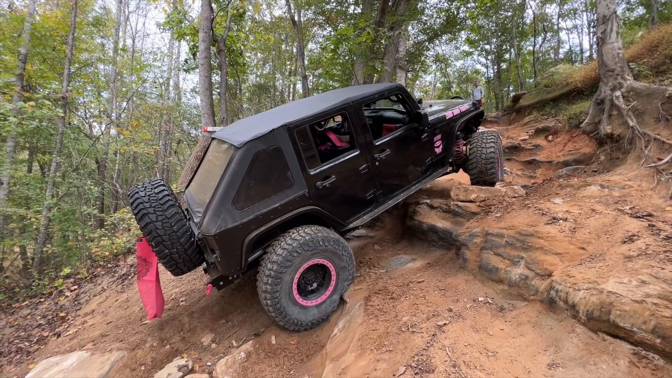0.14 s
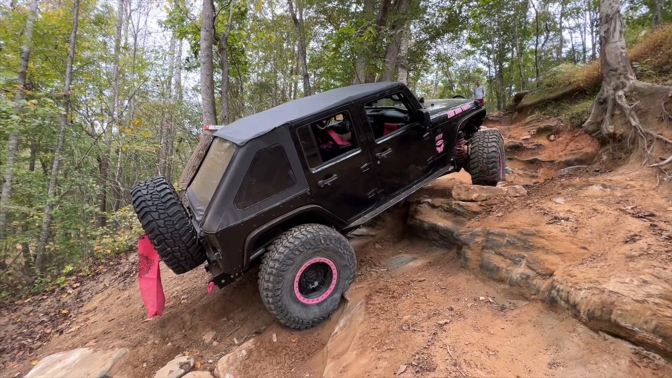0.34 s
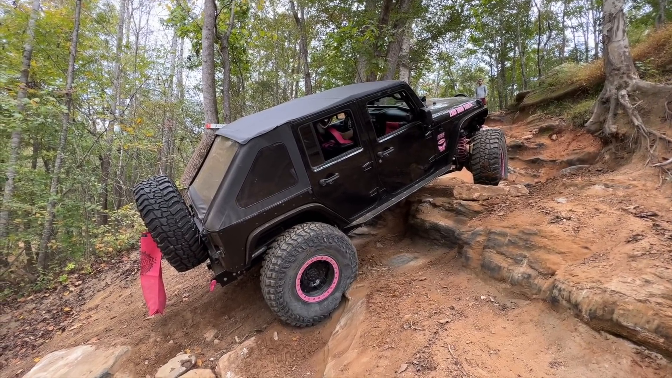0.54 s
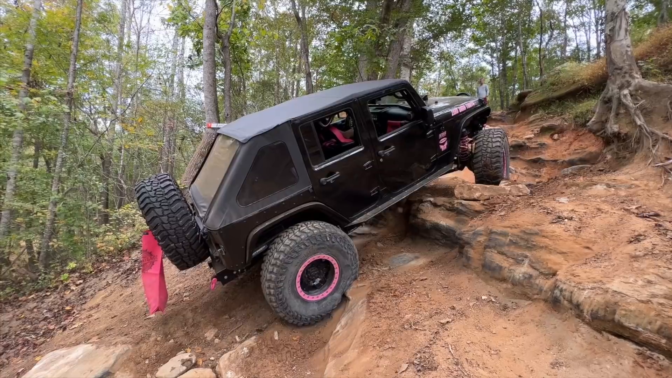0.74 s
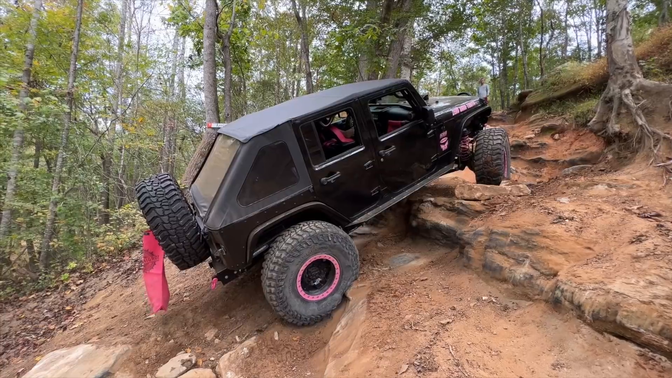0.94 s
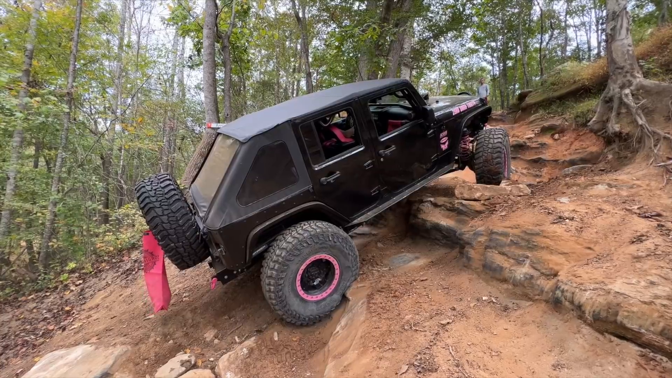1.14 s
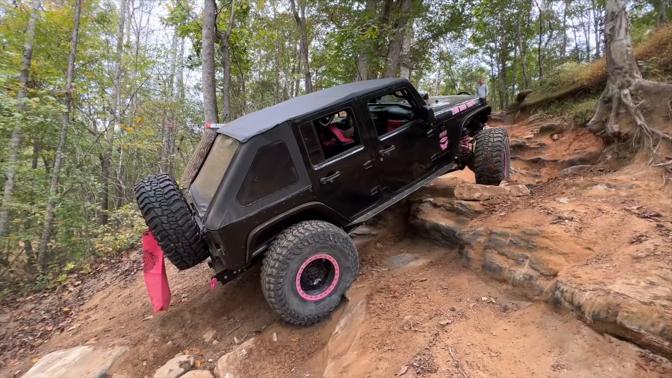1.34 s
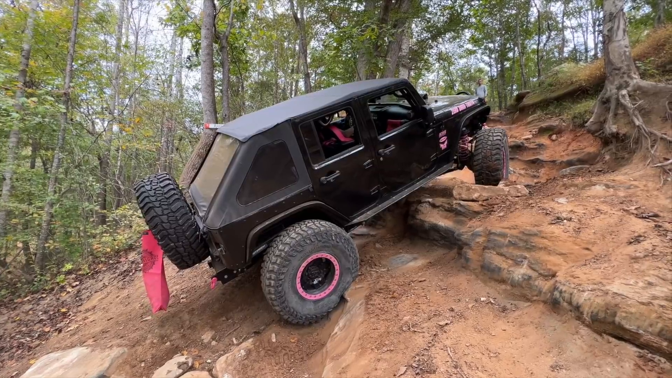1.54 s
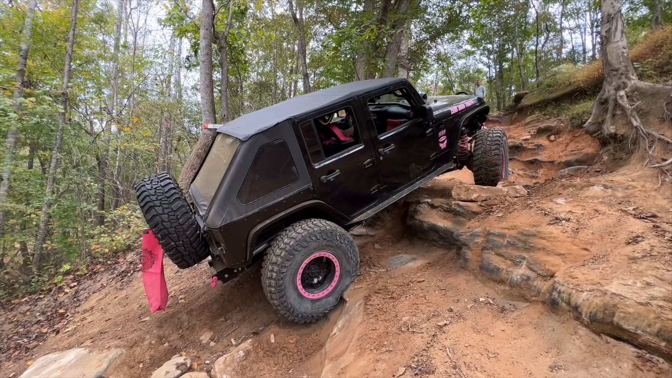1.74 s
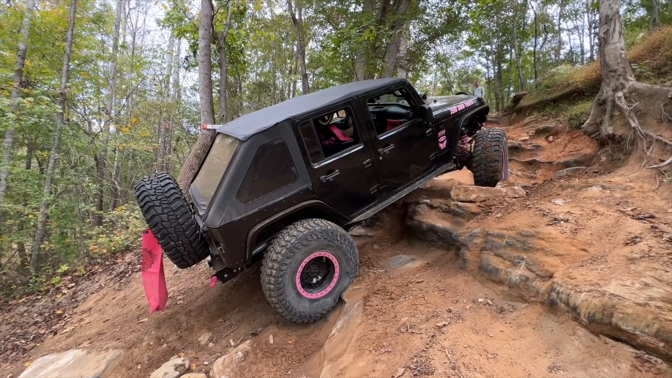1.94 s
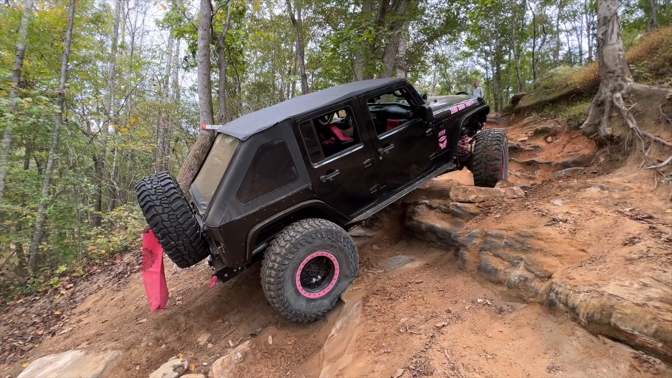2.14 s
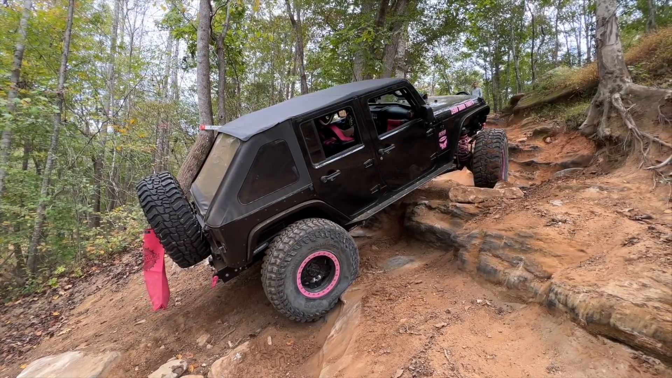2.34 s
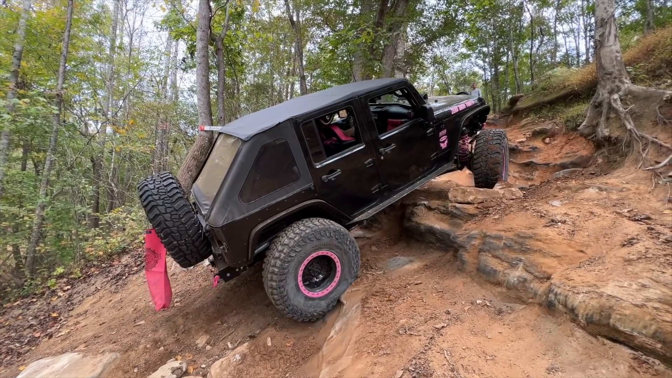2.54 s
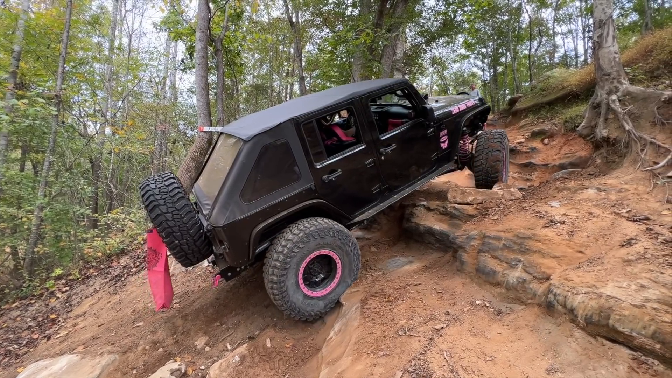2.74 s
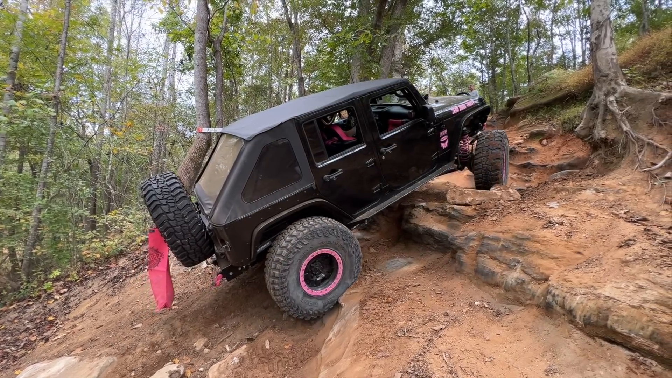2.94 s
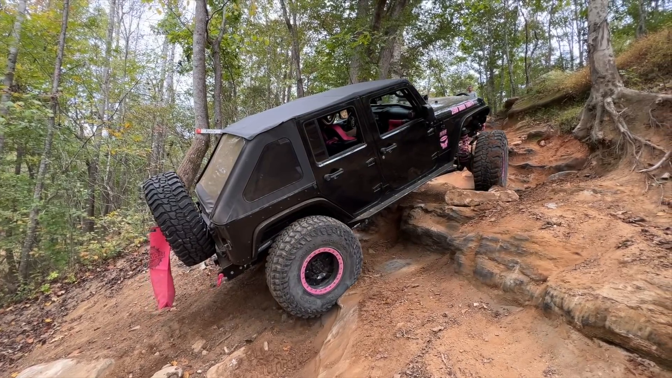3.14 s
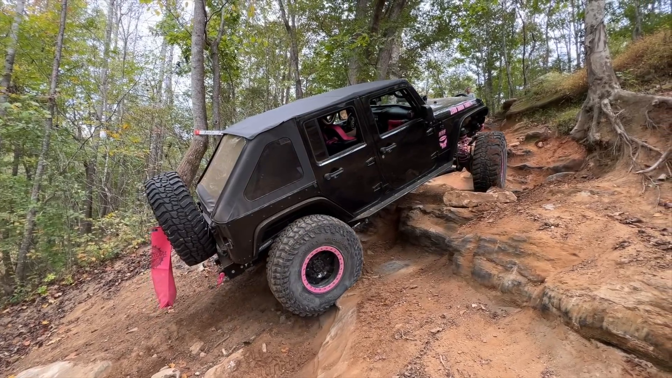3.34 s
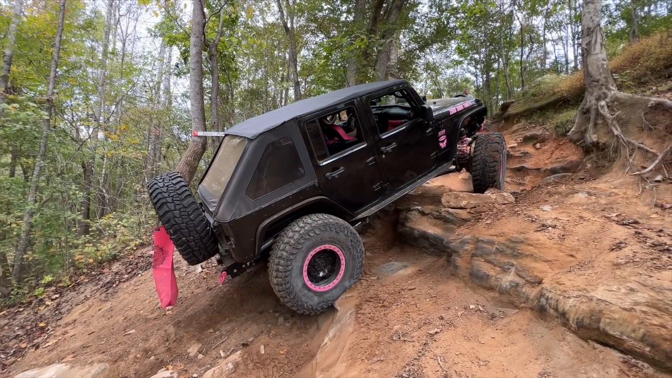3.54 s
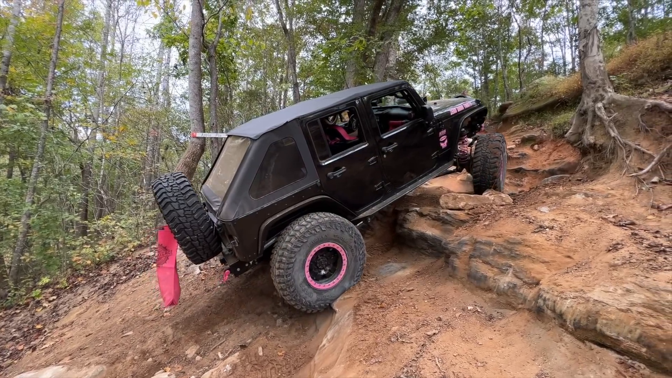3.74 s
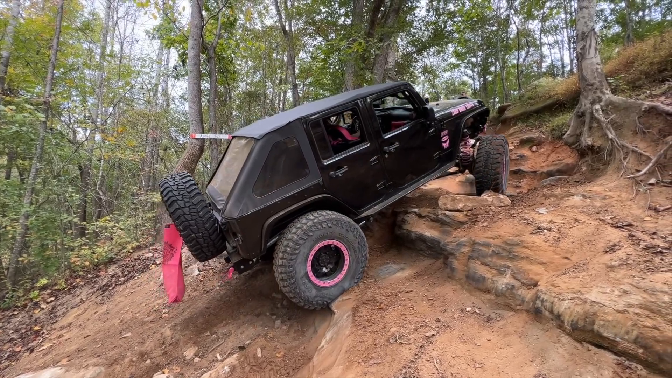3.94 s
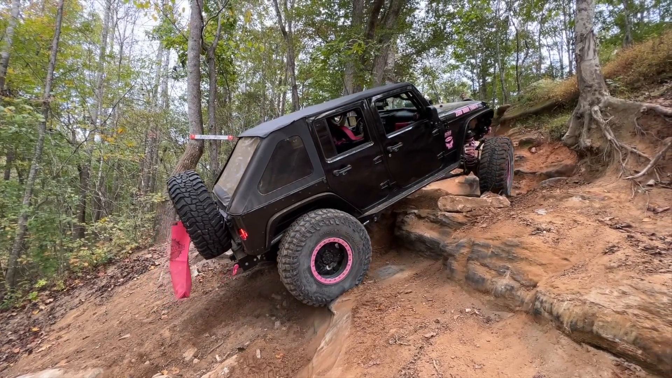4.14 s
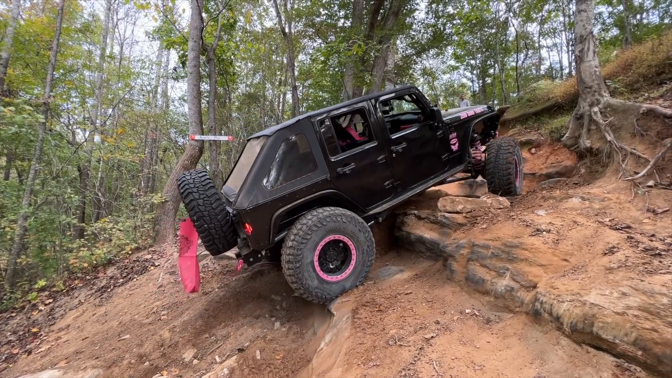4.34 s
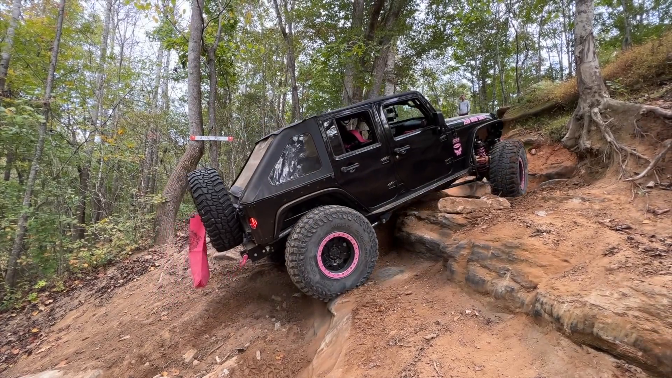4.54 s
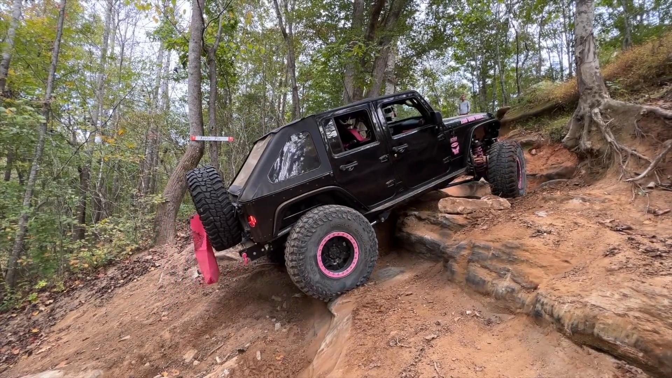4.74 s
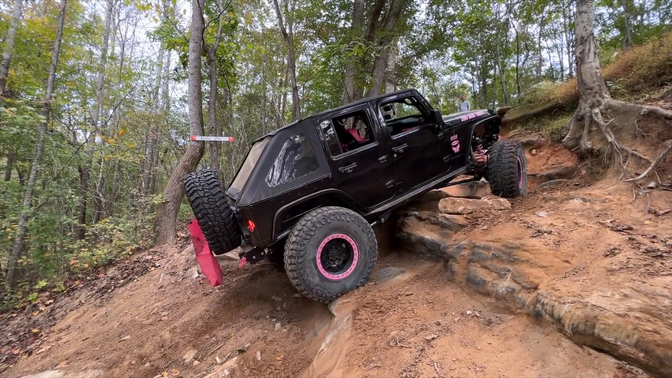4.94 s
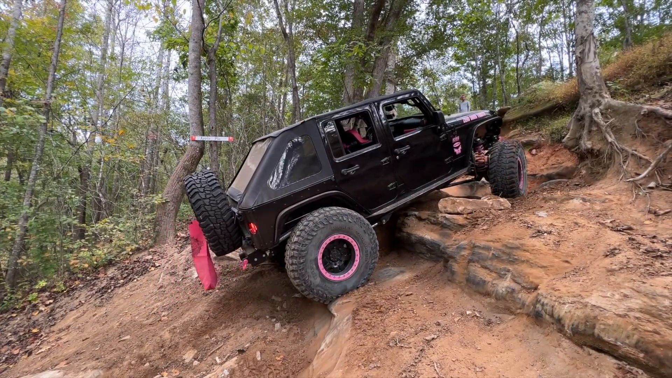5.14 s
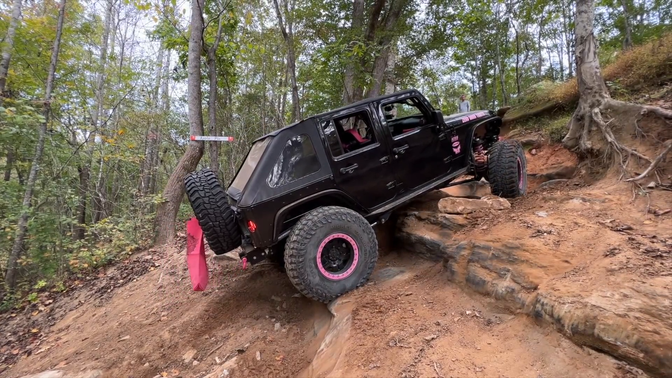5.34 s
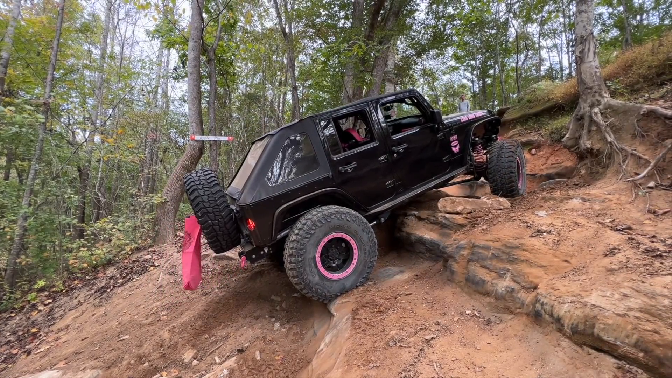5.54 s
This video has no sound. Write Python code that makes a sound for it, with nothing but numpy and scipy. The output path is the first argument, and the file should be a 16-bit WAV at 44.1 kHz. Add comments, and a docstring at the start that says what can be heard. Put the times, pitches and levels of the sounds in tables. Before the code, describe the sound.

Outdoors on a rocky forest slope, a six-cylinder vehicle engine holds a deep, buzzing exhaust hum with steady hiss and fast valve ticking. Tyres scuff and knock dully on rock now and then. Near four seconds metal chatters briefly, then the revs fall quickly to a soft uneven idle with thin creaks. Stereo microphone a few metres away, engine leaning slightly left.

```python
"""A six-cylinder off-road engine pulls at steady revs on a rocky forest slope, then falls to near idle.
The exhaust hums: sinusoids on the orders of the engine cycle, with turbulent rumble between them.
The block hisses and taps: coloured noise and valve impulses ring its resonant panels.
Tyres scuff and knock on rock: noise bursts and decaying sines. Metal chatters and squeals: filtered noise.
"""
import sys
import numpy as np
from scipy import signal
from scipy.fft import rfft, irfft, next_fast_len
from scipy.io import wavfile
from scipy.ndimage import uniform_filter1d

SR = 44100
rng = np.random.default_rng(int(sys.argv[2]) if len(sys.argv) > 2 else 0)


def master_out(mix):
    """Clip the mix to full scale and print it as 16-bit PCM to the path in sys.argv[1]."""
    frames = np.transpose(np.atleast_2d(mix))
    ceiling = np.clip(frames, -1, 1)
    pcm = np.round(ceiling * 32767).astype(np.int16)
    wavfile.write(sys.argv[1], SR, pcm)


N = 246821
T = np.arange(N) / SR  # s


def gain_of(db):
    """Decibel law: amplitude ratio of a level."""
    return 10 ** (np.asarray(db) / 20)


def evened(x):
    """Normalisation to an rms of 1."""
    return x / np.sqrt(np.mean(x ** 2) + 1e-20)


def read(points, hz):
    """Frequency response, interpolated on a logarithmic frequency axis."""
    f, value = np.transpose(points)
    return np.interp(np.log(hz + 1), np.log(f + 1), value)


def over_time(points, t=T):
    """Slow modulation, interpolated linearly in time."""
    return np.interp(t, *np.transpose(points))


def wander(hz):
    """Random modulation: low-pass noise of rms about 1, drawn every 64 samples."""
    drive = rng.standard_normal(N // 64 + 2)
    x = signal.lfilter([1], [1, -np.exp(-2 * np.pi * hz * 64 / SR)], drive)
    return np.interp(np.arange(N) / 64, np.arange(len(x)), evened(x))


def tilt(x, db_per_octave):
    """Spectral slope, pivoting near 2 kHz."""
    hz = np.fft.rfftfreq(x.shape[-1], 1 / SR)
    slope_db = db_per_octave * np.log2((hz + 300) / 2000)
    return irfft(rfft(x) * gain_of(slope_db), x.shape[-1])


def narrow(x, hz, width):
    """Resonance: a single mode of the given bandwidth, at rms 1."""
    return evened(signal.lfilter(*signal.iirpeak(hz, hz / width, SR), x))


def add(mix, s, sound, pan_db):
    """Superposition: adds the sound at s seconds, leaning left by pan_db."""
    at = round(s * SR)
    mix[:, at:at + sound.shape[-1]] += sound * gain_of([[pan_db / 2], [-pan_db / 2]])


# Level difference of the two sides. Each row: frequency in Hz, left over right in dB.
SIDE_LEVEL = [(60, 3), (110, -0.5), (200, 6), (380, 3), (700, 8), (1290, 3), (2380, -0.5), (4400, 8),
              (8120, 5), (15000, -6)]


def side_level_db(hz):
    """Interaural level difference as a function of frequency."""
    return read(SIDE_LEVEL, hz)


# Phase difference of the two sides. Each row: frequency in Hz, lead of the left in radians.
SIDE_PHASE = [(60, -1), (400, 0.5), (750, 2), (1100, 1.5), (2000, 8), (2800, 8), (5000, 8), (7500, 7.5),
              (8400, 8), (15000, -18.5)]
# Coherence of the two sides. Each row: frequency in Hz, left-right likeness from 0 to 1.
COHERENCE = [(60, .995), (300, .93), (600, .8), (1500, .66), (4000, .35), (10000, .7)]


def noise(shape_db, size, patchy_db):
    """Partly coherent stereo noise: random short-time spectra coloured by shape_db(hz, t), at rms 1."""
    hop = size // 4
    hz, t = np.fft.rfftfreq(size, 1 / SR)[:, None], np.arange(N // hop + 5) * hop / SR
    a, b, c, d, patches = rng.standard_normal((len(t), len(hz), 5)).T
    patches = uniform_filter1d(patches, size=9, axis=0)  # across frequency
    patches = evened(uniform_filter1d(patches, size=7, axis=1))  # across time
    left, stranger = a + 1j * b, c + 1j * d
    same = np.clip(read(COHERENCE, hz), 0, 1)
    shared = same * left * np.exp(-1j * read(SIDE_PHASE, hz))
    right = shared + np.sqrt(1 - same ** 2) * stranger
    lean = gain_of(side_level_db(hz) / 2)
    spectra = np.array([left * lean, right / lean]) * gain_of(shape_db(hz, t) + patchy_db * patches)
    return evened(signal.istft(spectra, nperseg=size, noverlap=size - hop)[1][:, :N])


# Engine speed. Each row: time in seconds, engine cycles per second.
ENGINE_SPEED = [(0, 10.45), (.07, 10.51), (.4, 11.65), (.5, 11.78), (.76, 11.55), (1.04, 11.63),
                (1.32, 11.9), (1.6, 12.06), (1.88, 11.93), (2.16, 11.95), (2.72, 11.55), (3.0, 11.22),
                (3.28, 11.13), (3.6, 11.21), (4.05, 10.76), (4.28, 10.27), (4.45, 9.35), (4.55, 8.55),
                (4.66, 7.75), (4.76, 7.22), (4.9, 6.98), (5.03, 6.99), (5.31, 7.39), (5.6, 7.02)]


def engine_speed(t=T):
    """Rotation rate, from which every order takes its frequency."""
    return over_time(ENGINE_SPEED, t)


# Strength of the firing. Each row: time in seconds, change in dB before each source takes its share.
THROTTLE_CHANGE = [(0, 0), (.3, -0.5), (.55, -1.5), (1.6, -0.5), (2.5, -0.5), (3.0, -2), (3.72, -2),
                   (3.86, -3), (4.1, -4.5), (4.2, -3.5), (4.33, -15), (4.45, -17), (4.55, -20.5),
                   (4.65, -22.5), (4.68, -24.5), (4.7, -26.5), (4.73, -21), (4.84, -19), (4.95, -15),
                   (5.2, -14.5), (5.4, -13.5), (5.6, -11.5)]


def throttle():
    """Load dependence: combustion weakens as the throttle closes."""
    return over_time(THROTTLE_CHANGE)


# Irregular firing off the throttle. Each row: time in seconds, spread in dB before shares.
STUMBLE_SPREAD = [(0, 0), (4.15, 0), (4.3, 2.5), (4.55, 2), (4.75, 1), (5.6, 1)]


def stumble():
    """Cycle-to-cycle variation: firing turns irregular off the throttle."""
    return over_time(STUMBLE_SPREAD)


# Level of the block hiss. Each row: time in seconds, level in dB.
HISS_LEVEL_DB = [(0, -47), (.3, -45), (.34, -46.5), (1.2, -45.5), (2.3, -46), (3.3, -48), (3.7, -45),
                 (4.2, -46), (4.55, -47), (4.8, -50.5), (5.6, -51)]
# Spectrum of the block hiss without its panels. Each row: frequency in Hz, relative density in dB per Hz.
HISS_SPECTRUM = [(300, -23), (500, -6.5), (650, -11), (800, -2.5), (1150, -9.5), (1220, -7.5),
                 (1900, -13.5), (2300, -16.5), (2600, -15), (4300, -24.5), (6000, -22), (9500, -26.5),
                 (11800, -30.5), (16000, -28)]
# Ringing panels of the block. Each row: frequency in Hz, nominal width in Hz, nominal height in dB.
PANEL_MODES = [(724, 26, 13), (853, 26, 10), (960, 60, 5), (1118, 36, 9), (2030, 30, 6), (2560, 60, 4),
               (5900, 200, 3)]


def block(cycles):
    """Forced resonance: hiss of valves, fan and intake rings panels, puffing each firing and cycle."""
    def shape_db(hz, t):
        """Resonance curves of the panels over the broadband hiss."""
        rings = sum(db / (1 + (2 * (hz - f) / width) ** 2) for f, width, db in PANEL_MODES)
        shaking = np.clip(engine_speed(t) / 5.8 - 1.1, 0, 1)  # panels ring less at low speed
        return read(HISS_SPECTRUM, hz) + 1.16 * rings * shaking
    puffs = 1 + .14 * np.cos(2 * np.pi * 6 * cycles) + .06 * np.cos(2 * np.pi * cycles)
    level_db = over_time(HISS_LEVEL_DB) + 0.1 * wander(9.0)
    return gain_of(level_db) * puffs * noise(shape_db, size=2048, patchy_db=2.0)


def tappets(cycles):
    """Impulse excitation: twelve valve taps a cycle, in a pattern of six, ring the lower panels."""
    tap = np.floor(12 * cycles).astype(int)
    # the pattern repeats every half cycle and differs by side
    pattern = np.sin(tap ** 2 * np.pi / 6 + np.array([[0], [1.]]))
    strength = gain_of(11 * pattern + .8 * wander(30.))
    taps = np.diff(tap, prepend=tap[0]) * strength
    rings = 0
    for hz, width, db in PANEL_MODES[:4]:
        once = narrow(taps, hz, 1.2 * width)
        rings = rings + gain_of(db / 2) * narrow(once, hz, 1.2 * width)
    return gain_of(-56 + 2.9 * throttle()) * evened(rings)


# Thin squeals and creaks. Each row: time of the middle in seconds, level in dB before the fade,
# half length in seconds, frequency in Hz, width in Hz.
SQUEAL_EVENTS = [(0.196, -67, 0.16, 6100, 170), (1.881, -44.5, 0.011, 2040, 280),
                 (3.702, -54, 0.1, 550, 20), (4.761, -65, 0.085, 8100, 150), (5.09, -51, 0.056, 520, 23),
                 (5.165, -57, 0.075, 675, 15), (5.263, -53, 0.069, 887, 19), (5.269, -61, 0.095, 478, 13),
                 (5.354, -59, 0.046, 555, 16), (5.434, -55, 0.06, 905, 25), (5.52, -50.5, 0.085, 693, 11)]


def squeals():
    """Narrow-band noise: each squeal or creak is one sharp resonance, swelling and fading."""
    out = np.zeros((2, N))
    for s, db, half, hz, width in SQUEAL_EVENTS:
        n = round(2 * half * SR)
        ringing = narrow(rng.standard_normal((2, 4 * n)), hz, width)
        squeal = ringing[:, -n:] * np.hanning(n)  # the resonance has built up by then
        add(out, max(s - half, 0), gain_of(db) * squeal[:, :N - round((s - half) * SR)], 3.)
    return out


# Metal chattering as the wheel lets go. Each row: start in seconds, relative level in dB,
# brightness in dB per octave, left over right in dB.
CLANKS = [(3.754, -31, -8, -4), (3.828, -33, -7, 2), (3.89, -37.5, -4, 2.5), (3.963, -38.5, -3, 1),
          (4.027, -42, -1.5, 6), (4.103, -51, -15, 6)]
# Modes of the metal. Each row: nominal frequency in Hz, width in Hz, nominal level in dB,
# time to fall by 60 dB in seconds.
METAL_MODES = [(990, 130, 1, .07), (1480, 160, -7, .12), (1990, 110, -2, .19), (2650, 400, -8, .07),
               (3400, 600, -8, .1), (3950, 160, -13, .28), (4880, 260, -11, .15), (5850, 220, -5.5, .22),
               (7700, 600, -12, .12)]


def metal():
    """Modal excitation: a rattle of contacts drives broad modes, treble at once, low modes later."""
    t, out = T[:6000], np.zeros((2, N))
    for s, db, bright, pan_db in CLANKS:
        draw = rng.standard_normal((3, len(t)))
        rattle = draw[:2] + 0.3 * draw[2]  # partly common to both sides
        sound = gain_of(-4) * rattle * (np.exp(-t / 0.009) + .2 * np.exp(-t / .08))
        for hz, width, mode_db, t60 in METAL_MODES:
            rise = (1 - np.exp(-t / (16.5 / hz))) ** 2
            decay = gain_of(-60 * t / t60) * (1 + 1.03 * np.exp(-t / 0.011))
            gain = gain_of(mode_db + 2 * rng.standard_normal())
            mode = narrow(rattle, hz * rng.uniform(.97, 1.03), width)
            sound = sound + gain * mode * rise * decay
        add(out, s, gain_of(db) * tilt(sound, bright), pan_db)
    return out


# Dull knocks through the body. Each row: start in seconds, level in dB before the soft onset, frequency in Hz.
KNOCKS = [(.703, -11.5, 408), (.706, -11.5, 327), (1.762, -29, 397), (2.138, -18, 189), (2.158, -21, 414),
          (4.125, -37, 328), (4.2, -21, 230), (4.207, -25.5, 315), (4.29, -30, 223), (4.293, -19.5, 304),
          (4.294, -32, 420), (4.325, -26, 151), (4.36, -31, 117.5), (4.42, -28.5, 226), (4.458, -27.5, 123),
          (4.522, -39, 140), (4.65, -32, 410), (4.835, -43, 268)]


def knocks():
    """Damped oscillation: each knock is a soft-edged sine that falls 60 dB in 23.5 periods."""
    t, out = T[:8000], np.zeros((2, N))
    for s, db, hz in KNOCKS:
        onset = (1 - np.exp(-t / .0024)) ** 2
        ring = gain_of(db - 60 * t * hz / 23.5) * np.sin(2 * np.pi * hz * t) * onset
        add(out, s, ring, 2.6)
    return out


# Tyre lugs slipping on rock. Each row: time of the peak in seconds, level in dB before the fade,
# half length in seconds, brightness in dB per octave, left over right in dB.
SCUFF_EVENTS = [(0.617, -40, 0.0051, -4, 3), (0.699, -42.5, 0.031, 1, -5.5), (0.717, -48, 0.043, 1, -2),
                (1.33, -48.5, 0.063, 0, 5), (1.724, -37.5, 0.006, -10, 2), (1.747, -37.5, 0.058, 2, 1),
                (1.812, -51, 0.0246, -17.5, -4), (2.153, -36.5, 0.048, 1.5, 0.5),
                (2.179, -52.5, 0.015, 0, 2), (2.504, -41, 0.0072, -17, -2.5), (2.56, -45.5, 0.13, 3.5, 3.5),
                (4.31, -49, 0.019, -3, -3), (4.388, -48, 0.027, -5, -7), (4.427, -37, .003, 7, -4),
                (4.462, -45, 0.03, -10, -2), (4.558, -55, 0.039, 1.5, 13), (4.653, -43.5, 0.057, 0, 1.5),
                (4.818, -37, 0.004, 11, 3), (4.869, -48.5, 0.064, 2, 2.5), (5.14, -55, .02, -3, 3)]
# Spectrum of a scuff before its brightness. Each row: frequency in Hz, relative density in dB per Hz.
SCUFF_SPECTRUM = [(350, -30.5), (600, -7), (1000, 9.5), (1500, -3), (2050, -5), (2550, -6.5), (3500, -9),
                  (3800, -21.5), (4500, -23), (6500, -18), (12000, -25.5), (16000, -13.5)]


def scuffs():
    """Frictional excitation: slipping lugs give soft-edged bursts of gritty noise."""
    grit = noise(lambda hz, t: read(SCUFF_SPECTRUM, hz) + 0 * t, size=256, patchy_db=2.5)
    grit, out = grit * gain_of(2.2 * wander(500.)), np.zeros((2, N))
    for s, db, half, bright, pan_db in SCUFF_EVENTS:
        at, n = round((s - half) * SR), round(2 * half * SR)
        burst = evened(tilt(grit[:, at:at + n], bright)) * np.hanning(n)
        add(out, s - half, gain_of(db) * burst, pan_db)
    return out


# Spectrum of the exhaust rumble. Each row: frequency in Hz, relative density in dB per Hz.
RUMBLE_SPECTRUM = [(20, -32), (34, -24), (48, -22), (92, -17), (140, -6), (190, -15), (280, -16.5),
                   (400, -24), (480, -31.5), (600, -37), (800, -67)]


def rumble():
    """Turbulence noise: gas in the pipe sounds between the orders and swells when the firing stumbles."""
    level_db = -40 + 0.72 * throttle() + 7.5 * stumble()
    turbulence = noise(lambda hz, t: read(RUMBLE_SPECTRUM, hz) + 0 * t, size=2048, patchy_db=2.)
    return gain_of(level_db) * turbulence


# Weaker upper orders while the revs first climb. Each row: time in seconds, change in dB before shares.
CLIMB_CHANGE = [(0, -9.5), (.3, -3.5), (.45, -0.5), (5.6, 1)]


def climb():
    """Spectral growth: the upper orders gain strength as the revs first climb."""
    return over_time(CLIMB_CHANGE)


# Orders that are multiples of the firing rate. Each entry: order, in periods per engine cycle.
FIRING_ORDERS = (6, 12, 18, 24, 36)
# Strength of each firing order. Each entry: relative level in dB before the silencer.
FIRING_LEVELS = [0.5, -1.7, 0, 0.5, -6.5]
# Each entry: share of the throttle change that the firing order follows.
THROTTLE_SHARES = [0.23, 0.49, 0.93, 2.88, 1.01]
# Each entry: share of the stumble that shakes the firing order.
STUMBLE_SHARES = [.1, .3, .4, .6, .5]
# Each entry: share of the climb change that the firing order follows.
CLIMB_SHARES = [0, 0, 2.1, 0.55, -0.3]
# Response of the silencer. Each row: frequency in Hz, gain in dB.
SILENCER_RESPONSE = [(40, -44), (49.5, -46), (53, -36), (57, -26), (72, -28.5), (85, -37), (105, -37),
                     (117, -29), (124, -17), (134, -10.5), (145, -14), (157, -21), (170, -42), (186, -39),
                     (196, -36.5), (208, -52), (250, -28.5), (270, -20.5), (290, -28.5), (375, -51.5),
                     (400, -40), (440, -51.5)]


def firing_orders(cycles):
    """Harmonic series of the firing rate through the silencer, as (order, level in dB, start in turns)."""
    speed, orders = engine_speed(), []
    settings = zip(FIRING_ORDERS, FIRING_LEVELS, THROTTLE_SHARES, STUMBLE_SHARES, CLIMB_SHARES)
    for order, db, load, shaken, dip in settings:
        level_db = db + read(SILENCER_RESPONSE, order * speed) + load * throttle() + dip * climb()
        level_db = level_db + (0.14 + shaken * stumble()) * wander(26.0)
        if order == FIRING_ORDERS[0]:  # the lowest thumps unevenly below 8.3 cycles per s
            lope = .7 * np.cos(2 * np.pi * 2 * cycles) + .4 * np.cos(2 * np.pi * cycles)
            lope = lope + .6 * wander(12.)
            level_db = level_db + 4.5 * lope * np.clip(8.3 - speed, 0, 1)
        orders.append((order, level_db, 0))
    return orders


# Weaker orders of the engine cycle. Each row: order in periods per cycle, relative level in dB
# before the pipe, dB gained per cycle/s of speed.
WEAKER_ORDERS = [(5, -57, -4.5), (7, -64.5, 0.5), (8, -53.5, 1), (9, -47.5, -1), (10, -59, 0),
                 (11, -62, -2.5), (13, -51.5, 0.5), (15, -37, 11), (16, -49, -10), (19, -51.5, -0.5),
                 (21, -38.5, 4), (23, -50.5, 14.5), (25, -42.5, -1.5), (26, -45, -6), (27, -44, -6),
                 (28, -64.5, 1), (29, -51.5, 2.5), (30, -39.5, -4.5), (31, -47.5, 0.5), (32, -46, -14),
                 (33, -49.5, -8.5), (34, -60.5, -0.5), (37, -66.5, -0.5), (38, -48.5, 1.5), (39, -42, -5.5),
                 (41, -52.5, -7.5), (45, -53, -3), (48, -48.5, 0.5)]
# Response of the pipe to the weaker orders. Each row: frequency in Hz, gain in dB.
PIPE_RESPONSE = [(35, -2.5), (70, -9.5), (105, 2.5), (140, 7.5), (175, -13), (215, -12.5), (270, 7),
                 (310, 3), (355, 2), (395, -6), (440, 0), (470, -11.5), (540, -19)]


def weaker_orders():
    """Further orders of the engine cycle, nearly in step, so that they throb once a cycle."""
    speed, orders = engine_speed(), []
    for order, db, rise_db in WEAKER_ORDERS:
        level_db = db - 2 + rise_db * np.clip(speed - 11.6, -.5, .5)
        level_db = level_db + read(PIPE_RESPONSE, order * speed) + (order > 25.5) * climb()
        level_db = level_db + 1.2 * throttle()  # they fade faster than most of the firing orders
        level_db = level_db + 1.9 * wander(0.2) + stumble() * wander(7.2)
        start = .67 - .1 * order  # the throb trails the firing
        start = start + .7 * (29 <= order <= 34)  # this group swings against the throb
        start = start + .3 * (order > 26) * (speed - 12)
        orders.append((order, level_db, start + .03 * rng.standard_normal()))
    return orders


# The car drifts left. Each row: time in seconds, left over right in dB.
CAR_DRIFT = [(0, -1), (.5, -2), (3, -1.5), (4.2, 0.5), (5.6, 0.5)]


def exhaust(cycles):
    """Order synthesis: sinusoids locked to the cycle waver in phase and reach the left side first."""
    speed, side, out = engine_speed(), np.array([[.5], [-.5]]), 0
    for order, level_db, start in firing_orders(cycles) + weaker_orders():
        lead = .00042 * order * speed * side  # arrival gap in s, as turns
        # the pipe delays high orders as the speed falls
        slip = .3 * np.clip(order / 12 - 1, 0, 1) * (speed - 12)
        waver = 0.0012 * np.sqrt(order) * wander(44.0)
        turns = order * cycles + lead + start + slip + waver
        pan_db = side_level_db(order * speed) + over_time(CAR_DRIFT)
        amplitude = np.sqrt(2) * gain_of(level_db + 0.5 + side * pan_db)
        out = out + amplitude * np.cos(2 * np.pi * turns)
    return out


def scene():
    """Superposition of all sources; the engine's share one cycle count, the integral of its speed."""
    cycles = .62 + np.cumsum(engine_speed()) / SR  # starts part-way through a cycle
    engine = block(cycles) + tappets(cycles) + rumble() + exhaust(cycles)
    return engine + squeals() + metal() + knocks() + scuffs()


# Treble response with two deep dips. Each row: frequency in Hz, gain in dB.
TREBLE_RESPONSE = [(9500, -0.5), (9900, -3.5), (10200, -33.5), (10500, -2.5), (11500, 1.5), (13000, -1.5),
                   (13600, -21), (14300, -27.5), (14700, -10.5), (16000, -7)]


def record(dry):
    """Linear filtering: after an early 3 dB step down in level, the treble dips and the band is limited."""
    size = next_fast_len(N + 4096)
    stepped = dry * gain_of(3 * np.clip(.5 - (T - .317) / .008, 0, 1))  # dB; step at .317 s
    response = gain_of(read(TREBLE_RESPONSE, np.fft.rfftfreq(size, 1 / SR)))
    coloured = irfft(rfft(stepped, size) * response, size)[:, :N]
    band_limit = signal.firwin(511, 15800, window=("kaiser", 9), fs=SR)  # edge in Hz
    return signal.oaconvolve(coloured, band_limit[None], "same")


dry = scene()
out = record(dry)
master_out(out)
```